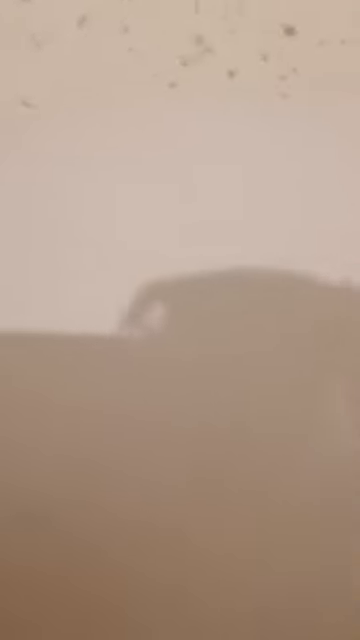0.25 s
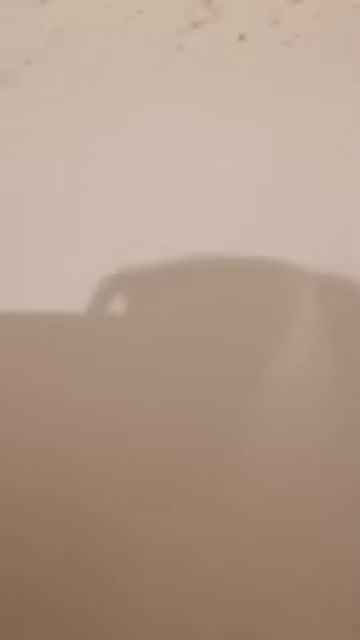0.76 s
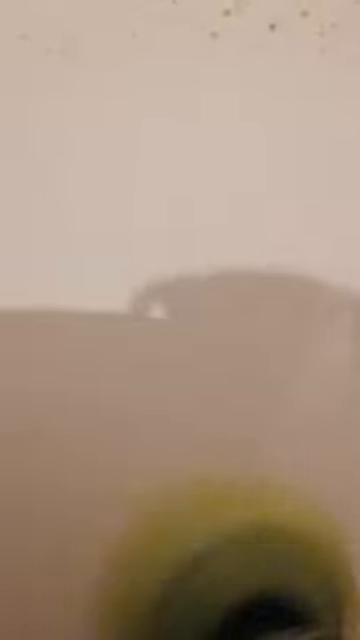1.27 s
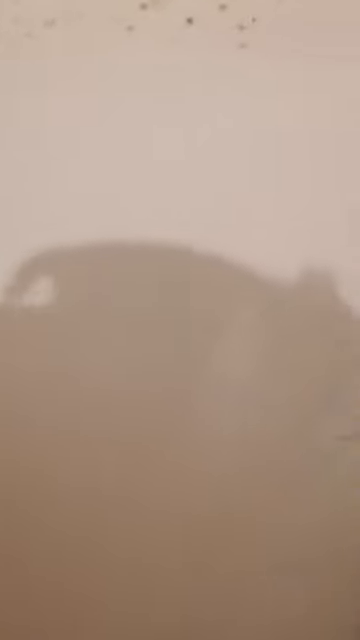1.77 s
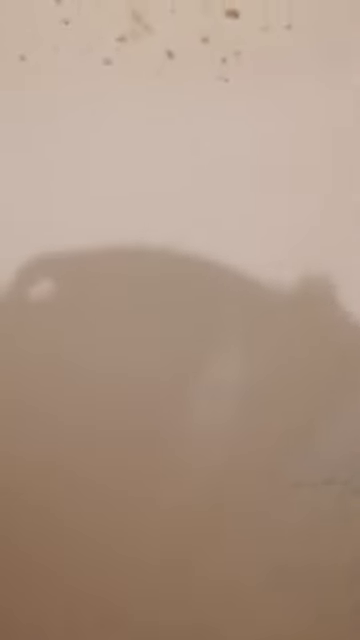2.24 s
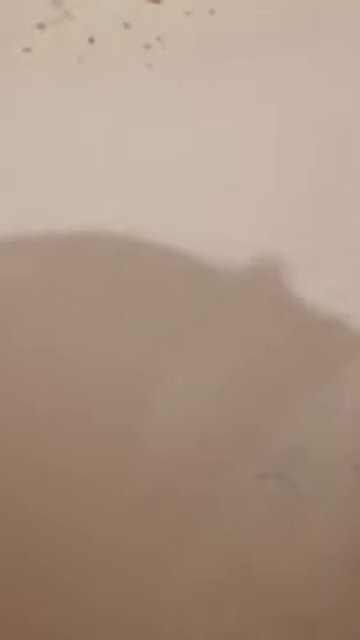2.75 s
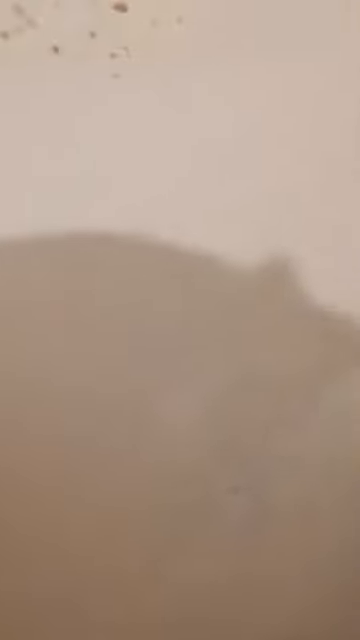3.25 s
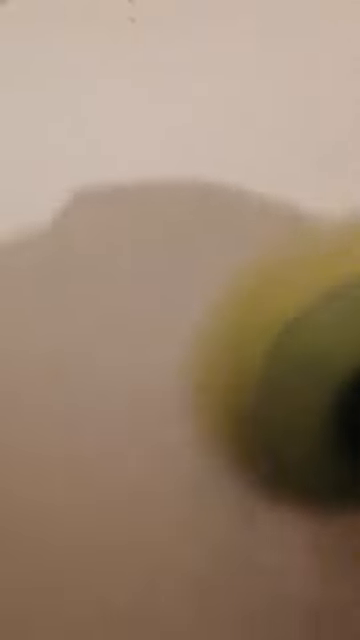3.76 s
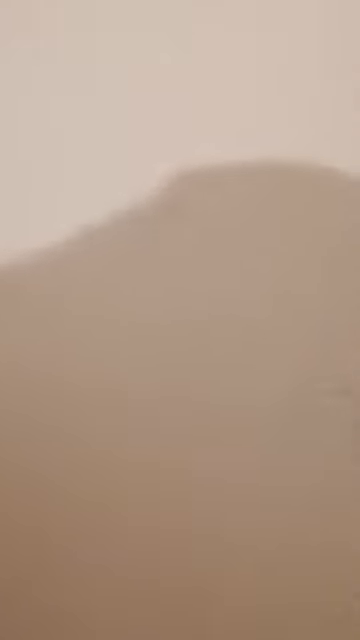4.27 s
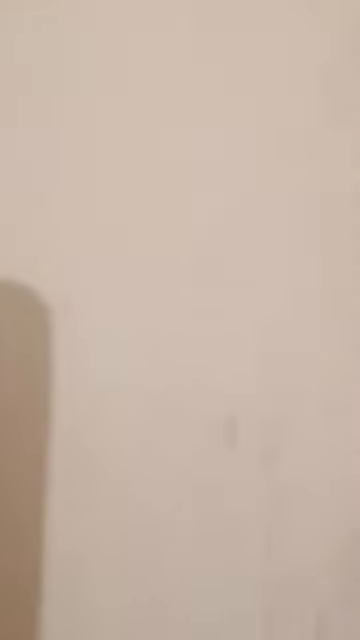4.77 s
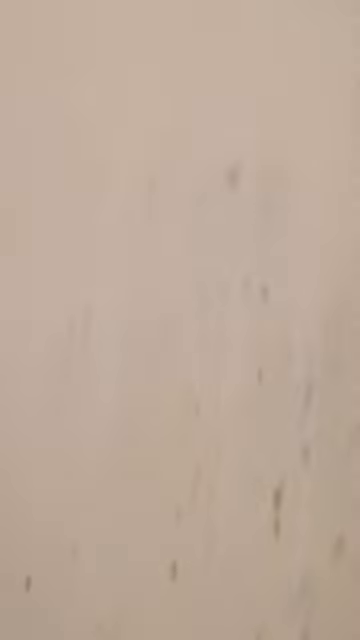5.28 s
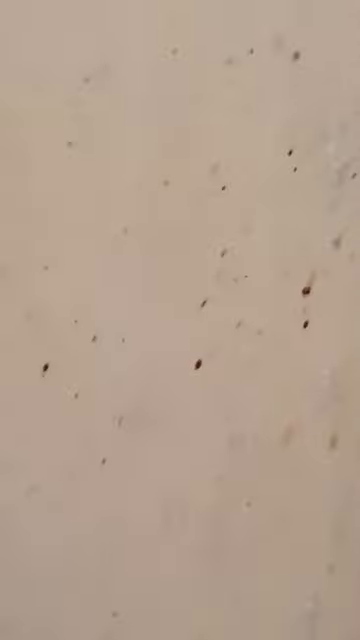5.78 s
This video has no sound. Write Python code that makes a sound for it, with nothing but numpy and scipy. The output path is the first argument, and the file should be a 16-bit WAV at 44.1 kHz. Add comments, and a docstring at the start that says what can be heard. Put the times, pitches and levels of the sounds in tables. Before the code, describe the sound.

A battery drill spins a brush against a wall with a loud scrubbing rush and motor whine, then stops abruptly.

```python
"""A battery drill spins a bristle brush against a wall in a small hard room, near two microphones.
The bristles flick the wall and make a loud rush; the motor and its gears hum and whine through it.
After about four seconds the brake grips with a rasp, the room rings out and the brush drags off the wall.
Faint hiss, small ticks and the bumps of hands on the drill remain."""
import sys
import numpy as np
from scipy import signal
from scipy.fft import rfft, irfft, next_fast_len
from scipy.io import wavfile

SR = 44100
rng = np.random.default_rng(int(sys.argv[2]) if len(sys.argv) > 2 else 0)


def output_pcm(signal):
    """Save a mono or channel-first signal as 16-bit PCM at the path in sys.argv[1].

    Samples are clipped to [-1, 1] before scaling.
    """
    pcm = np.clip(np.atleast_2d(signal).T, -1, 1) * 32767
    wavfile.write(sys.argv[1], SR, np.round(pcm).astype(np.int16))


N = 265482
STOP_S = 4.21   # when the drill stops
PAN = np.array([[.5], [-.5]])   # splits pan_db (left minus right) between the two sides

# How the brush presses on the wall: time_s, pressure_db, wall_drumming_db, pan_db
BRUSH_CONTACT = [(0, 3.5, -3, -1.5), (.13, 4.5, -4.5, -2.5), (.41, 3.5, -1, -0.5), (.71, 3.5, -4.5, -1.5),
                 (.98, 1.5, -2.5, -3.5), (1.26, 2.5, 0, -2), (1.57, 4, -1, -1), (1.88, 3, 0.5, 0.5),
                 (2.26, 2.5, 1.5, 2.5), (2.55, 2, 5.5, -1.5), (2.8, 3, 1, 3.5), (3.1, 2, 3.5, -2),
                 (3.25, 2, 2.5, 2), (3.5, 3, 3, 0.5), (3.85, 3.5, 1.5, 0), (4.02, 4, 0.5, 0.5),
                 (4.11, 6.5, -5.5, -1.5), (4.2, 1, 3, -4.5)]
# Small shuffles of hands and brush: middle_s, quarter_length_s, scuff_db, rumble_db, hiss_boost_db
SHUFFLE_MOVES = [(4.87, 0.031, -59, -74, -1), (4.932, 0.05, -65, -74, 0), (5.126, .03, -69, -82, -0.5),
                 (5.21, .02, -78, -78, 0.5), (5.277, 0.017, -60, -71, 1.5), (5.367, .04, -82, -73, 2),
                 (5.454, 0.022, -67, -81, 2.5), (5.514, 0.022, -76, -69, 3.5),
                 (5.693, 0.027, -67, -81, 1.5), (5.753, 0.013, -63, -65, -1), (5.808, 0.043, -69, -65, 0),
                 (5.906, 0.038, -74, -59, -0.5), (5.994, 0.033, -65, -65, 0)]


def amp(db):
    """Turn decibels into a number to multiply by."""
    return 10 ** (np.asarray(db) / 20)


def rms_one(x):
    """Scale a signal so that its average strength (rms) is 1."""
    return x / np.sqrt(np.mean(x ** 2) + 1e-20)


def in_time(rows):
    """Join a table's rows into curves, one value per sample; the first column is time."""
    times, *columns = np.transpose(rows)
    return [np.interp(np.arange(N) / SR, times, column) for column in columns]


def at_hz(points, hz):
    """Look up a value by pitch, with octaves evenly spaced."""
    pitches, values = np.transpose(points)
    return np.interp(np.log(hz), np.log(pitches), values)


def drift(rate_hz):
    """A smooth random wobble, about 1 in size."""
    step, warm_up = 40, 2000
    pole = np.exp(-2 * np.pi * rate_hz * step / SR)
    noise = rng.standard_normal(N // step + warm_up + 2)
    slow = signal.lfilter([1], [1, -2 * pole, pole * pole], noise)[warm_up:]
    return np.interp(np.arange(N) / step, np.arange(len(slow)), rms_one(slow - slow.mean()))


def coloured(x, spectrum, peaks=()):
    """Shape noise with a tone curve and rounded peaks, then scale it to strength 1."""
    size = next_fast_len(N)
    hz = np.arange(size // 2 + 1) * SR / size + 1
    peaks_db = sum(db / (1 + (2 * (hz - centre) / width) ** 2) for centre, width, db in peaks)
    return rms_one(irfft(rfft(x, size) * amp(at_hz(spectrum, hz) + peaks_db), size)[..., :N])


def band(x, low_hz, high_hz):
    """Keep the sound between two pitches."""
    edges = [low_hz, min(high_hz, .45 * SR)]
    return signal.sosfilt(signal.butter(2, edges, "band", fs=SR, output="sos"), x)


def swells(heights):
    """One smooth hump for each shuffle."""
    out = np.zeros(N + SR)
    for (middle_s, quarter_length_s, *_), height in zip(SHUFFLE_MOVES, heights):
        hump = np.hanning(int(4 * quarter_length_s * SR))
        out[int(middle_s * SR) - len(hump) // 2:][:len(hump)] += height * hump
    return out[:N]


def room_fade(hz):
    """1 while the drill runs; then the room rings out at this pitch, fast at first and slower later."""
    # Time the main ringing takes to fall 60 dB: pitch_hz, fade_s
    quick_fade = [(100, 0.65), (1000, 0.22), (5000, 0.22), (12000, 0.068)]
    # The same for its faint tail: pitch_hz, fade_s
    slow_fade = [(1000, 0.56), (3000, .6), (6000, .4), (12000, .35)]
    since_s = np.arange(N - int(STOP_S * SR)) / SR
    quick = amp(-60 * since_s / at_hz(quick_fade, hz))
    slow = amp(-60 * since_s / at_hz(slow_fade, hz))
    slow_share = amp(-27) ** 2
    fade = np.sqrt((1 - slow_share) * quick ** 2 + slow_share * slow ** 2)
    return np.append(np.ones(N - len(fade)), fade)


def bristle_rush():
    """Countless bristle flicks on the wall blur into a rush, heard directly and bounced off the room."""
    # Tone of the flicks: pitch_hz, level_db
    rush_tone = [(18, -67), (30, -43), (275, -14), (313, -19.5), (348, -13), (514, -7), (586, -13.5),
                 (780, -2.5), (1710, -4.5), (3270, -3), (4140, -2.5), (5510, 1), (8590, -11), (9290, -9.5),
                 (12500, -23.5), (15200, -30)]
    # How much arrives without bouncing: pitch_hz, share
    direct_share = [(60, 0.56), (250, 1), (600, 0.59), (1200, 0.65), (2500, 0.34), (6000, 0.24),
                    (12000, 0.054)]
    # The left side hears the moving drill later: time_s, delay_samples
    left_delay = [(0, 13), (.8, 14), (1.4, 11), (2.2, 3), (3.5, 3.5), (4.2, 11)]
    # Change as the drill turns to face the microphones: pitch_hz, gain_db
    facing_gain = [(40, 13), (100, 2), (300, 6), (800, -4), (2400, 4.5), (5400, -1), (10000, 1.5)]
    # Where the wall drums: pitch_hz, share
    drum_share = [(300, 0), (800, 1), (2000, 0)]
    # Tone as the drill turns: time_s, bass_db, mid_left_db, mid_right_db, treble_left_db, treble_right_db
    tone_changes = [(0, -8, -1, 3, -6, -0.5), (.3, -5, 0.5, -2, -2, 1), (.55, -1, -1, 3, -2.5, 1),
                    (.8, -4, -1.5, 3, -4, 2.5), (1.1, -3, 0.5, 2, -0.5, 3), (1.4, 0, 1, 3, -3, 1.5),
                    (1.8, -2, -1.5, -1.5, -0.5, 1.5), (2.1, 2, -5, 0, -2, -1.5), (2.5, -1, -0.5, -2, 1, 1),
                    (2.8, 7, -4, 0.5, -1.5, -0.5), (3.1, 4, 0, -3, 0.5, -0.5),
                    (3.3, 5, -1.5, -0.5, 0.5, 1.5), (3.55, 7, -3, -1.5, -0.5, 0), (3.8, 9, 0.5, 1, -1.5, 0),
                    (4.1, -8, -1.5, 1, -4, 1.5), (4.3, 2, 4, 1, 6, 5)]
    # Where bass, mids and treble lie, each: pitch_hz, share
    bass_share = [(100, 1), (200, 0)]
    mid_share = [(900, 0), (1400, 1), (2000, 1), (2800, 0)]
    treble_share = [(5500, 0), (9000, 1)]
    # The shape of the microphone openings favours one side: pitch_hz, pan_db
    side_bias = [(60, 6), (99, -7), (160, 6), (270, -12), (440, 2), (730, -4.5), (1210, 7), (2000, -0.5),
                 (3290, 5), (5430, -4), (8960, 8.5), (14800, -11)]
    # Resonances of drill case, wall and openings: pitch_hz, width_hz, left_db, right_db
    resonances = [(1005, 420, 2, 5), (1460, 400, 2, -1), (1930, 400, 4, -1.5), (2860, 1080, 1, 6),
                  (3080, 310, 4, 2.5), (4630, 220, 5.5, -0.5), (5520, 540, -5, -1.5), (7050, 420, 1.5, 1.5),
                  (7890, 860, 5, -0.5), (9200, 600, 0, -1), (14000, 780, 14, 3)]
    pressure_db, drum_db, pan_db = in_time(BRUSH_CONTACT)
    delay, = in_time(left_delay)
    facing = (13 - delay) / 10   # 0 pointing away, 1 facing the microphones
    bass_db, *upper_db = in_time(tone_changes)
    mid_db, treble_db = np.reshape(upper_db, (2, 2, N))
    flicks = rng.standard_normal((3, N)) * amp(2.48 * np.minimum(rng.exponential(1, (3, N)), 4))
    direct, *bounced = coloured(flicks, rush_tone)
    direct = np.array([np.interp(np.arange(N) - delay, np.arange(N), direct), direct])
    pressure_wobble, bristle_wobble = drift(6), drift(12)
    edges_hz = np.append(20, 70 * 2 ** np.arange(0, 8.1, .5))
    rush = 0
    for k, (low, high) in enumerate(zip(edges_hz, edges_hz[1:])):
        hz = np.sqrt(low * high)
        level_db = pressure_db + at_hz(drum_share, hz) * drum_db + at_hz(facing_gain, hz) * (facing - .5)
        tone_db = at_hz(bass_share, hz) * bass_db + at_hz(mid_share, hz) * mid_db
        tone_db += at_hz(treble_share, hz) * treble_db
        flicker_db = .29 * pressure_wobble + np.array([drift(7.5), drift(12.4)])
        flicker_db += at_hz([(3000, .29), (12000, .82)], hz) * bristle_wobble
        side_db = PAN * (pan_db * min(hz / 500, 1) + at_hz(side_bias, hz))
        gain = amp(level_db + tone_db + flicker_db + side_db) * room_fade(hz)
        share = at_hz(direct_share, hz)
        mix = np.sqrt(share) * direct + np.sqrt(1 - share) * np.array(bounced)
        rush += (-1) ** k * band(mix, low, high) * gain   # flip every other band so edges do not cancel
    peaks = [(hz, width, np.array([[left], [right]])) for hz, width, left, right in resonances]
    return amp(-26.5) * coloured(rush, [(20, 0), (20000, 0)], peaks)


def bright_rings():
    """Bristle noise rings in three high, narrow bands that slide as the drill turns."""
    # The three resonances, each: time_s, left_hz, right_hz, left_db, right_db
    main_ring = [(0.07, 5680, 5650, -31, -27), (0.25, 5810, 5610, -34, -31.5), (.4, 5670, 5480, -27.5, -29),
                 (0.55, 5840, 5550, -29, -28.5), (0.72, 5610, 5800, -33, -25.5),
                 (.9, 5440, 5480, -30, -26.5), (1.08, 5350, 5520, -38, -25),
                 (1.3, 5550, 5420, -31.5, -30.5), (1.53, 5690, 5590, -25.5, -28.5),
                 (1.7, 5654, 5570, -29, -30), (1.86, 5674, 5620, -31, -37), (2.02, 5680, 5440, -27.5, -31),
                 (2.3, 5580, 5405, -31.5, -29.5), (2.55, 5656, 5590, -29, -39),
                 (2.83, 5590, 5540, -27, -27.5), (3.05, 5720, 5420, -29, -38),
                 (3.2, 5660, 5510, -26.5, -31), (3.33, 5593, 5440, -31, -58),
                 (3.48, 5580, 5530, -27.5, -26), (3.75, 5620, 5420, -31.5, -49),
                 (4, 5634, 5393, -32, -26.5), (4.13, 5540, 5550, -30, -27.5)]
    lower_ring = [(0.1, 5180, 5140, -42, -36), (0.3, 5230.0, 5220, -34, -35),
                  (0.5, 5200.0, 5230.0, -44, -33), (0.7, 5194, 5090, -35, -29),
                  (0.9, 5220.0, 5220, -37.0, -30), (1.1, 5240.0, 5170, -37, -42),
                  (1.3, 5160, 5160.0, -43, -33), (1.5, 5196, 5200, -34, -33), (1.7, 5136, 5164, -28, -33),
                  (1.9, 5190, 5240, -40, -41), (2.1, 5150, 5074, -45, -36.0), (2.3, 5230, 5140, -39, -30),
                  (2.5, 5140.0, 5200, -36, -40), (2.7, 5130.0, 5210, -53, -42), (2.9, 5260, 5214, -34, -31),
                  (3.1, 5210, 5165, -42, -40), (3.3, 5210, 5200, -47, -30), (3.5, 5170.0, 5206, -31, -35),
                  (3.7, 5225, 5140, -44, -44), (3.9, 5220, 5246, -34, -30), (4.1, 5140, 5190, -33, -28)]
    upper_ring = [(0, 6120, 6300, -37, -34), (.3, 6200, 6200, -49, -52), (.5, 6186, 6200, -49, -47),
                  (.62, 6250, 6240, -34, -31), (.85, 6140, 6150, -40, -36), (1.1, 6150, 6150, -39, -40),
                  (1.6, 6230, 6240, -36, -39), (1.9, 6200, 6220, -46, -44), (2.5, 6206, 6197, -50, -44),
                  (3, 6204, 6190, -40, -38), (3.5, 6194, 6204, -38, -44), (4.2, 6200, 6200, -42, -42)]
    out = 0
    for ring, width_hz in (main_ring, 540), (lower_ring, 680), (upper_ring, 820):
        left_hz, right_hz, left_db, right_db = in_time(ring)
        phase = 2 * np.pi * np.cumsum([left_hz, right_hz], axis=1) / SR
        smoothing = signal.butter(2, width_hz / 2, fs=SR, output="sos")
        slow_noise = signal.sosfilt(smoothing, rng.standard_normal((2, 2, N)))
        # Slow noise times a tone gives a band of noise around that tone.
        ringing = rms_one(slow_noise[0] * np.cos(phase) + slow_noise[1] * np.sin(phase))
        level_db = np.array([left_db + 1.2 * drift(13), right_db + .73 * drift(3.6)])
        out += ringing * amp(level_db)
    return out * room_fade(8900)


def wall_echoes(x):
    """Quick echoes off nearby walls colour the treble; their delays sway as the drill moves."""
    # Echo delays, a left row and a right row: first_s, second_s, third_s
    echo_delays = [
        [.0017, .0031, .0053],
        [.0021, .0037, .0047],
    ]
    split_hz, sway_s, echo_gain = 1800, .00012, amp(-9)
    low = signal.sosfilt(signal.butter(4, split_hz, "low", fs=SR, output="sos"), x)
    high = signal.sosfilt(signal.butter(4, split_hz, "high", fs=SR, output="sos"), x)
    samples, echoes = np.arange(N), np.zeros((2, N))
    for side, delays in enumerate(echo_delays):
        for delay_s in delays:
            echoes[side] += np.interp(samples - SR * (delay_s + sway_s * drift(1.2)), samples, high[side])
    return low + (high + echo_gain * echoes) / np.sqrt(1 + 3 * echo_gain ** 2)


def motor_whine():
    """The off-balance motor hums; gear teeth and sliding contacts whine at multiples of its speed."""
    # Motor speed: time_s, turns_per_s
    speed = [(0.04, 317.0), (0.1, 316.3), (0.16, 316.3), (0.22, 315.8), (0.28, 314.0), (0.34, 314.4),
             (0.4, 316.9), (0.46, 315.5), (0.52, 315.5), (0.58, 313.6), (0.64, 314.6), (0.7, 315.2),
             (0.76, 316.7), (0.82, 317.0), (0.88, 317.2), (0.94, 316.8), (1.0, 317.5), (1.06, 317.5),
             (1.12, 317.6), (1.18, 317.5), (1.24, 317.3), (1.3, 317.4), (1.36, 315.8), (1.42, 315.6),
             (1.48, 316.6), (1.54, 313.9), (1.6, 312.0), (1.66, 312.6), (1.72, 312.2), (1.78, 312.1),
             (1.84, 312.3), (1.9, 312.8), (1.96, 312.2), (2.02, 313.9), (2.08, 315.6), (2.14, 316.0),
             (2.2, 316.8), (2.26, 316.0), (2.32, 316.7), (2.38, 314.3), (2.44, 312.1), (2.5, 311.9),
             (2.56, 311.5), (2.62, 312.0), (2.68, 311.2), (2.74, 312.2), (2.8, 313.1), (2.86, 313.1),
             (2.92, 313.2), (2.98, 312.9), (3.04, 312.3), (3.1, 311.4), (3.16, 311.0), (3.22, 310.6),
             (3.28, 311.4), (3.34, 312.6), (3.4, 310.8), (3.46, 308.5), (3.52, 311.0), (3.58, 313.6),
             (3.64, 311.6), (3.7, 310.4), (3.76, 310.9), (3.82, 310.5), (3.88, 311.0), (3.94, 311.9),
             (4.0, 312.5), (4.06, 312.2), (4.12, 313.5), (4.18, 315.5)]
    # Hum, one cycle per turn: time_s, left_db, right_db
    hum_levels = [(0.08, -58, -67), (0.2, -56, -55), (0.32, -50, -52), (0.44, -56, -55), (0.56, -47, -52),
                  (0.68, -50.5, -56.0), (0.8, -52, -55), (0.92, -53, -53.0), (1.04, -64.0, -48),
                  (1.16, -76.0, -52), (1.28, -76.0, -48), (1.4, -66.0, -48.5), (1.52, -56, -51),
                  (1.64, -52, -48), (1.76, -52.0, -50.0), (1.88, -51, -49), (2.0, -48, -54),
                  (2.12, -45, -47), (2.24, -47, -50), (2.36, -47, -49.0), (2.48, -48, -48), (2.6, -50, -50),
                  (2.72, -45.5, -50), (2.84, -43.5, -50.0), (2.96, -46.5, -47.0), (3.08, -50, -47),
                  (3.2, -45, -49), (3.32, -45, -47), (3.44, -49, -49.0), (3.56, -43, -50.0),
                  (3.68, -49, -47.0), (3.8, -48, -48), (3.92, -54, -45), (4.04, -56, -44.0),
                  (4.16, -52, -43.5)]
    # A standing wave in the room makes the left hum trail: time_s, lag_radians
    hum_lag = [(0, .8), (.55, 1.9), (.9, 3), (1.3, 2.9), (1.6, 1.2), (2, .2), (3.6, .2), (4.2, 1.5)]
    # Main whines: time_s, gear_left_db, gear_right_db, contact_left_db, contact_right_db
    whine_levels = [(0.04, -42.0, -43.0, -33.0, -38.0), (0.1, -41.0, -35.0, -41.0, -41.0),
                    (0.16, -40.0, -37.0, -43.0, -43.0), (0.22, -42.0, -39.0, -55.0, -43.0),
                    (0.28, -42.0, -51.0, -42.0, -40.0), (0.34, -40.0, -39.0, -40.0, -40.0),
                    (0.4, -37.0, -38.0, -40.0, -35.0), (0.46, -33.0, -35.0, -40.0, -34.0),
                    (0.52, -45.0, -43.0, -41.0, -40.0), (0.58, -55.0, -42.0, -44.0, -37.0),
                    (0.64, -44.0, -39.0, -44.0, -36.0), (0.7, -38.0, -42.0, -39.0, -34.0),
                    (0.76, -43.0, -38.0, -34.0, -34.0), (0.82, -44.0, -41.0, -38.0, -38.0),
                    (0.88, -55.0, -47.0, -44.0, -35.0), (0.94, -52.0, -41.0, -43.0, -33.0),
                    (1.0, -40.0, -48.0, -35.0, -35.0), (1.06, -45.0, -49.0, -38.0, -38.0),
                    (1.12, -41.0, -57.0, -42.0, -47.0), (1.18, -37.0, -44.0, -42.0, -36.0),
                    (1.24, -42.0, -39.0, -47.0, -33.0), (1.3, -40.0, -35.0, -47.0, -34.0),
                    (1.36, -39.0, -48.0, -42.0, -34.0), (1.42, -43.0, -45.0, -42.0, -34.0),
                    (1.48, -43.0, -32.0, -41.0, -34.0), (1.54, -37.0, -29.0, -40.0, -40.0),
                    (1.6, -30.0, -34.0, -39.0, -43.0), (1.66, -30.0, -35.0, -36.0, -40.0),
                    (1.72, -35.0, -45.0, -38.0, -46.0), (1.78, -38.0, -40.0, -50.0, -46.0),
                    (1.84, -36.0, -43.0, -45.0, -40.0), (1.9, -46.0, -53.0, -45.0, -44.0),
                    (1.96, -35.0, -36.0, -49.0, -41.0), (2.02, -34.0, -35.0, -36.0, -36.0),
                    (2.08, -33.0, -38.0, -54.0, -38.0), (2.14, -36.0, -40.0, -47.0, -42.0),
                    (2.2, -40.0, -45.0, -43.0, -43.0), (2.26, -35.0, -41.0, -43.0, -42.0),
                    (2.32, -33.0, -50.0, -41.0, -43.0), (2.38, -34.0, -46.0, -39.0, -53.0),
                    (2.44, -31.0, -41.0, -36.0, -46.0), (2.5, -39.0, -55.0, -34.0, -42.0),
                    (2.56, -34.0, -44.0, -34.0, -38.0), (2.62, -34.0, -40.0, -35.0, -37.0),
                    (2.68, -33.0, -40.0, -32.0, -39.0), (2.74, -33.0, -47.0, -35.0, -41.0),
                    (2.8, -31.0, -39.0, -44.0, -42.0), (2.86, -31.0, -36.0, -37.0, -53.0),
                    (2.92, -32.0, -40.0, -35.0, -48.0), (2.98, -31.0, -38.0, -39.0, -53.0),
                    (3.04, -33.0, -38.0, -37.0, -47.0), (3.1, -42.0, -47.0, -32.0, -35.0),
                    (3.18, -35.0, -50.0, -34.0, -44.0), (3.24, -28.0, -38.0, -36.0, -51.0),
                    (3.3, -35.0, -46.0, -38.0, -39.0), (3.35, -28.0, -41.0, -37.0, -42.0),
                    (3.395, -33.0, -42.0, -40.0, -42.0), (3.46, -25.0, -33.0, -35.0, -37.0),
                    (3.53, -32.0, -42.0, -47.0, -44.0), (3.58, -34.0, -42.0, -44.0, -51.0),
                    (3.64, -35.0, -52.0, -40.0, -46.0), (3.7, -35.0, -39.0, -37.0, -38.0),
                    (3.76, -33.0, -35.0, -30.0, -45.0), (3.82, -38.0, -32.0, -35.0, -36.0),
                    (3.88, -49.0, -36.0, -41.0, -45.0), (3.94, -33.0, -35.0, -41.0, -55.0),
                    (4.0, -33.0, -32.0, -41.0, -46.0), (4.06, -33.0, -37.0, -34.0, -40.0),
                    (4.12, -47.0, -54.0, -55.0, -46.0), (4.18, -58.0, -47.0, -52.0, -48.0)]
    # Shifting echoes make the left whines trail: time_s, gear_lag_radians, contact_lag_radians
    whine_lags = [(0.04, -2.3, -2.1), (0.1, -1.7, -2.3), (0.16, -1.6, -3.2), (0.22, -1.6, -3.8),
                  (0.28, -3.2, -3.9), (0.34, -3.7, -5.1), (0.4, -2.9, -5.2), (0.46, -3.1, -5.2),
                  (0.52, -4.1, -2.3), (0.58, -3.6, -3.7), (0.64, -1.7, -2.1), (0.7, -4.7, -2.0),
                  (0.76, -7.2, -1.1), (0.82, -5.9, -0.3), (0.88, -6.0, -1.8), (0.94, -6.3, -2.2),
                  (1.0, -7.3, -2.0), (1.06, -10.0, -2.9), (1.12, -9.8, -3.9), (1.18, -10.9, -4.1),
                  (1.24, -10.5, -4.4), (1.3, -9.6, -4.2), (1.36, -8.6, -4.5), (1.42, -10.5, -5.7),
                  (1.48, -12.2, -6.2), (1.54, -9.9, -6.0), (1.6, -10.4, -7.6), (1.66, -10.6, -6.7),
                  (1.72, -12.4, -5.9), (1.78, -14.3, -2.9), (1.84, -16.3, -1.6), (1.9, -15.4, -2.4),
                  (1.96, -16.7, -3.4), (2.02, -17.9, -4.3), (2.08, -18.6, -2.9), (2.14, -18.5, -5.9),
                  (2.2, -19.3, -5.7), (2.26, -20.0, -6.2), (2.32, -19.2, -6.4), (2.38, -18.6, -4.9),
                  (2.44, -16.5, -4.5), (2.5, -14.8, -2.8), (2.56, -17.0, -2.6), (2.62, -17.3, -3.6),
                  (2.68, -18.5, -4.8), (2.74, -20.6, -7.5), (2.8, -18.8, -5.9), (2.86, -19.1, -6.7),
                  (2.92, -18.1, -4.7), (2.98, -17.3, -5.8), (3.04, -15.8, -3.2), (3.1, -15.8, -3.7),
                  (3.16, -16.9, -4.2), (3.22, -19.5, -5.7), (3.28, -20.0, -5.7), (3.34, -17.0, -4.5),
                  (3.4, -18.5, -4.2), (3.46, -19.1, -4.2), (3.52, -19.4, -5.2), (3.58, -18.2, -8.1),
                  (3.64, -16.8, -10.3), (3.7, -16.6, -10.8), (3.76, -15.7, -10.4), (3.82, -14.8, -10.2),
                  (3.88, -16.7, -11.5), (3.94, -17.0, -13.6), (4.0, -16.7, -13.1), (4.06, -16.3, -13.5),
                  (4.12, -16.3, -15.1), (4.18, -15.2, -15.1)]
    # Four weaker motor whines: cycles_per_turn
    weak_multiples = [10, 22, 29, 30]
    # Their loudness: time_s, then left_db, right_db for each
    weak_levels = [(0.1, -50.0, -51.0, -48.0, -43.0, -54.0, -49.0, -54.0, -52.0),
                   (0.29, -40.0, -50.0, -49.0, -53.0, -52.0, -52.0, -55.0, -58.0),
                   (0.48, -48.0, -55.0, -46.0, -53.0, -53.0, -51.0, -52.0, -56.0),
                   (0.67, -46.0, -44.0, -50.0, -39.0, -52.0, -50.0, -55.0, -48.0),
                   (0.86, -47.0, -45.0, -54.0, -44.0, -50.0, -45.0, -54.0, -44.0),
                   (1.05, -56.0, -54.0, -56.0, -44.0, -45.0, -47.0, -53.0, -48.0),
                   (1.24, -44.0, -50.0, -45.0, -49.0, -46.0, -47.0, -54.0, -47.0),
                   (1.43, -55.0, -51.0, -45.0, -49.0, -48.0, -50.0, -55.0, -54.0),
                   (1.62, -45.0, -47.0, -40.0, -48.0, -50.0, -54.0, -52.0, -52.0),
                   (1.81, -43.0, -50.0, -42.0, -48.0, -56.0, -57.0, -51.0, -61.0),
                   (2.0, -38.0, -37.0, -40.0, -52.0, -43.0, -63.0, -51.0, -58.0),
                   (2.19, -40.0, -39.0, -58.0, -65.0, -45.0, -54.0, -56.0, -70.0),
                   (2.38, -46.0, -38.0, -53.0, -55.0, -50.0, -56.0, -57.0, -66.0),
                   (2.57, -38.0, -36.0, -47.0, -47.0, -51.0, -53.0, -48.0, -62.0),
                   (2.76, -39.0, -39.0, -44.0, -49.0, -44.0, -59.0, -56.0, -61.0),
                   (2.95, -53.0, -40.0, -47.0, -50.0, -48.0, -51.0, -44.0, -62.0),
                   (3.14, -38.0, -39.0, -42.0, -49.0, -42.0, -60.0, -47.0, -58.0),
                   (3.33, -42.0, -40.0, -45.0, -48.0, -48.0, -55.0, -50.0, -64.0),
                   (3.52, -38.0, -41.0, -40.0, -46.0, -49.0, -59.0, -49.0, -59.0),
                   (3.71, -38.0, -39.0, -39.0, -47.0, -45.0, -56.0, -51.0, -59.0),
                   (3.9, -40.0, -45.0, -50.0, -44.0, -46.0, -57.0, -51.0, -55.0),
                   (4.09, -50.0, -42.0, -43.0, -41.0, -53.0, -58.0, -50.0, -67.0)]
    # How rough each one is: roughness
    weak_roughness = [1.0, .45, .45, .4]
    # Faint tones of motor and gears: cycles_per_turn
    faint_multiples = [31 / 12, 4, 5, 8, 9]
    # Their loudness: level_db
    faint_levels = [-51, -52, -53.5, -49.5, -53]
    since_s = np.arange(N) / SR - STOP_S
    braking = np.clip((since_s + .041) / .042, 0, 1)
    turns_per_s = in_time(speed)[0] * (1 - .3 * braking) * (1 + .00034 * drift(11))
    angle = 2 * np.pi * np.cumsum(turns_per_s) / SR
    wavers, slips, jitters = [np.array([drift(hz) for _ in range(5)]) for hz in (14, 2, 30)]
    gear_db, contact_db = np.reshape(in_time(whine_levels), (2, 2, N))
    weak_db = np.reshape(in_time(weak_levels), (-1, 2, N))
    side_db = PAN * in_time(BRUSH_CONTACT)[2]
    hum, gear, contact = 1, 32 / 3, 15   # cycles per turn
    tones = [(hum, np.array(in_time(hum_levels)), 0), (gear, gear_db, .15), (contact, contact_db, .3)]
    tones += zip(weak_multiples, weak_db, weak_roughness)
    tones += [(multiple, db + side_db, .5) for multiple, db in zip(faint_multiples, faint_levels)]
    left_lags = dict(zip((hum, gear, contact), in_time(hum_lag) + in_time(whine_lags)))
    out = 0
    for multiple, level_db, roughness in tones:
        pair = rng.choice(5, 2, replace=False)   # a different wobble for each side
        phase_wobble = min(multiple / 8, 1.5) * (.5 * slips[pair] + roughness * jitters[pair[0]])
        phase = rng.uniform(0, 2 * np.pi) + phase_wobble
        waver_db = 2.6
        if multiple in left_lags:
            phase[0] = phase[1] - left_lags[multiple]
            waver_db = 1
        out += amp(level_db + waver_db * wavers[pair]) * np.sin(multiple * angle + phase)
    fade_s = .12
    return np.sqrt(2) * out * amp(-60 * np.maximum(since_s, 0) / fade_s)


def room_hiss():
    """Faint hiss wavers and rustles with the shuffles; a thin high tone in it comes and goes."""
    # Tone of the hiss: pitch_hz, level_db
    hiss_tone = [(18, -29), (30, 2.5), (108, -10.5), (313, -16), (440, -5.5), (514, -24), (1310, -7.5),
                 (1990, -6.5), (4030, -5), (9290, -8.5), (15200, -34)]
    # Peaks in it: pitch_hz, width_hz, gain_db
    hiss_peaks = [(764, 260, 15), (1315, 47, 10), (2660, 590, 4.5), (4200, 42, 8), (5750, 330, 7),
                  (7200, 1700, 4)]
    # Loudness of the thin tone: time_s, level_db
    thin_levels = [(4.68, -85), (4.75, -80), (4.78, -66), (4.9, -69), (5.0, -74), (5.05, -70), (5.12, -82),
                   (5.2, -80), (5.24, -70), (5.3, -72), (5.36, -82), (5.5, -72), (5.57, -64), (5.63, -72),
                   (5.66, -82), (5.7, -68), (5.75, -80), (5.9, -84), (5.96, -70), (6.02, -76)]
    white = rng.standard_normal((3, N))
    hiss = coloured(white[:2] + .14 * white[2], hiss_tone, hiss_peaks)
    edges_hz = [25, 300, 1500, 2500, 3600, 5000, 7500, 11000, 17000]
    wavering = sum((-1) ** k * band(hiss, low, high) * amp(2.2 * drift(7.7))
                   for k, (low, high) in enumerate(zip(edges_hz, edges_hz[1:])))
    hiss_db = -55.5 + swells(np.transpose(SHUFFLE_MOVES)[4])
    thin_hz = 5790 + 5 * drift(15)
    thin_tone = np.sqrt(2) * np.sin(2 * np.pi * np.cumsum(thin_hz) / SR) * amp(in_time(thin_levels)[0])
    return (wavering * amp(hiss_db) + thin_tone) * amp(PAN * 5.5)


def brake_and_ticks():
    """The brake rasps as it grips, and small ticks follow; each is a short burst of noise."""
    # Brake rasps: start_s, level_db, pitch_hz, width_hz, rise_s, pan_db
    rasps = [(4.138, -24, 2954, 700, 0.022, -8), (4.194, -25, 3010, 700, 0.0088, 1),
             (4.197, -48, 1395, 330, 0.0057, -9), (4.205, -19.5, 3885, 900, 0.0026, -2)]
    # Ticks and scuffs: start_s, level_db, pitch_hz, width_hz, rise_s, pan_db
    ticks = [(4.574, -51, 5790, 380, 0.008, 12), (4.736, -54, 4050, 600, 0.004, 5.0),
             (5.133, -52, 2700, 500, 0.0049, 8), (5.145, -51, 4200, 500, .004, 5),
             (5.205, -49, 3900, 800, 0.008, 5.0), (5.266, -52, 797, 190, 0.004, 7),
             (5.527, -48, 7900, 1400, 0.006, 8), (5.681, -45, 7400, 2400, 0.003, 6),
             (5.71, -43.5, 11800, 2800, 0.005, -10), (5.708, -45, 4300, 800, 0.006, -2),
             (5.712, -49, 6700, 1300, 0.009, 0), (5.937, -54, 5880, 1400, 0.004, -1)]
    out = np.zeros((2, N + SR))
    t = np.arange(SR // 10) / SR
    for start_s, level_db, pitch_hz, width_hz, rise_s, pan_db in rasps + ticks:
        noise = band(rng.standard_normal((2, len(t))), pitch_hz - width_hz / 2, pitch_hz + width_hz / 2)
        burst = rms_one(noise) * t / rise_s * np.exp(1 - t / rise_s)
        out[:, int(start_s * SR):][:, :len(t)] += .5 * amp(level_db + PAN * pan_db) * burst
    return out[:, :N]


def drag_and_rumble():
    """After the stop the slack brush drags with a dull rasp, and hands on the drill rumble."""
    # Tone of the dragging brush: pitch_hz, level_db
    drag_tone = [(210, -53), (350, -6), (419, -11.5), (738, -2.5), (1720, -12.5), (2300, -14.5),
                 (3000, -10), (3900, -17), (6600, -39)]
    # Peaks in it: pitch_hz, width_hz, gain_db
    drag_peaks = [(700, 180, 3.5), (1080, 150, 5), (2060, 90, 10)]
    t = np.arange(N) / SR
    since_s, lets_go_s = t - STOP_S, 4.56
    scuff_db, lump_db = np.transpose(SHUFFLE_MOVES)[2:4]
    drag_db = -48 - 11 * since_s - 163 * np.maximum(t - lets_go_s, 0)   # drops fast once off the wall
    drag_gain = amp(np.maximum(drag_db, -64.5)) + swells(amp(scuff_db))
    rumble_gain = amp(np.maximum(-54.5 - 28 * since_s, -71.5)) + swells(amp(lump_db))
    middle, spread = rng.standard_normal((2, 2, N))
    opposite = np.array([[1], [-1]])
    drag = coloured(middle[0] + .64 * spread[0] * opposite, drag_tone, drag_peaks)
    drag *= drag_gain * amp(.83 * drift(25))
    rumble = rms_one(band(middle[1] + .47 * spread[1] * opposite, 33, 280))
    rumble *= rumble_gain * amp(2.3 * drift(11))
    return np.clip(since_s / .028, 0, 1) * (drag + rumble)


def sliding_tones():
    """While the brush drags, faint wavering tones swell, slide down and fade."""
    # Falling tones: start_s, length_s, from_hz, to_hz, level_db, pan_db
    slides = [(4.29, .18, 660, 640, -56.5, 11), (4.3, 0.072, 785, 400, -58, 2),
              (4.4, 0.194, 770, 695, -61, 1), (4.36, 0.097, 1110, 1030, -61, 2),
              (4.3, .06, 1185, 1175, -55, 2)]
    out = np.zeros((2, N))
    for start_s, length_s, from_hz, to_hz, level_db, pan_db in slides:
        size = int(length_s * SR)
        phase = 2 * np.pi * np.cumsum(np.linspace(from_hz, to_hz, size)) / SR
        tone = np.sqrt(2) * np.sin(phase) * signal.windows.tukey(size, .5)
        out[:, int(start_s * SR):][:, :size] += tone * amp(level_db + PAN * pan_db)
    return out * amp(1.5 * drift(20))


def hand_bumps():
    """Each bump of a hand rocks the drill's case for a cycle or two."""
    # Bumps: start_s, level_db, pitch_hz, rise_s
    bumps = [(4.378, -47, 110, 0.0055), (4.423, -44, 106, 0.0041), (4.448, -47, 110, 0.0056),
             (5.733, -52, 254, 0.0058), (5.734, -47, 480, 0.0016), (5.745, -50, 412, 0.0016),
             (5.767, -54, 448, 0.0039), (5.86, -52, 85, 0.0099), (5.919, -53, 227, 0.0038)]
    out = np.zeros(N + SR)
    t = np.arange(SR // 10) / SR
    for start_s, level_db, pitch_hz, rise_s in bumps:
        swell = t / rise_s * np.exp(1 - t / rise_s)
        out[int(start_s * SR):][:len(t)] += amp(level_db) * swell * np.sin(2 * np.pi * pitch_hz * t)
    return out[:N]


def scene():
    """Add up all the sounds, left and right."""
    drill = wall_echoes(bright_rings() + bristle_rush()) + motor_whine()
    stopping = drag_and_rumble() + sliding_tones() + brake_and_ticks() + hand_bumps()
    return drill + stopping + room_hiss()


def record(dry):
    """Cut off the very highest treble steeply."""
    cutoff_hz = 15250
    return signal.sosfilt(signal.ellip(12, .5, 60, cutoff_hz, fs=SR, output="sos"), dry)


dry = scene()
out = record(dry)
output_pcm(out)
```